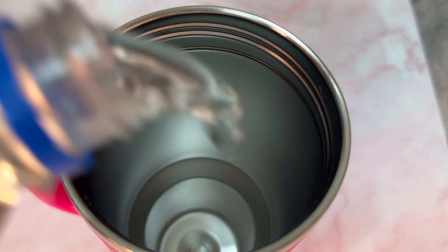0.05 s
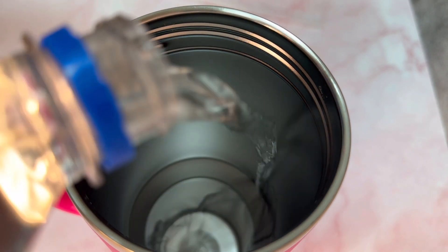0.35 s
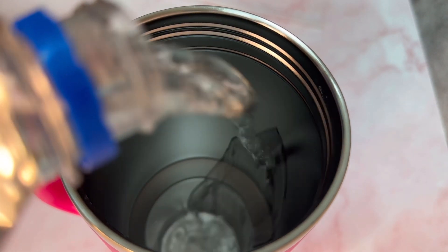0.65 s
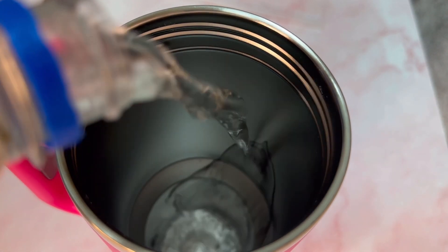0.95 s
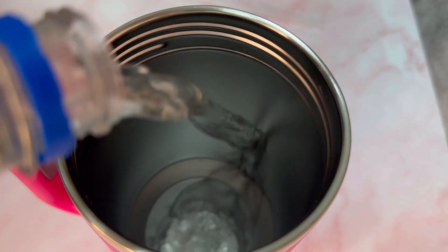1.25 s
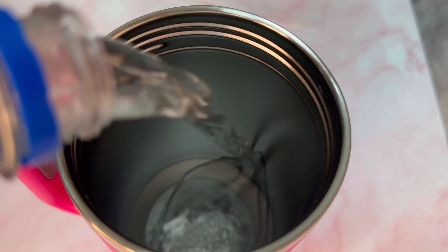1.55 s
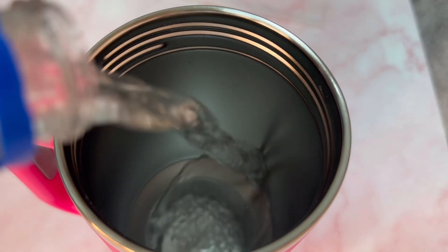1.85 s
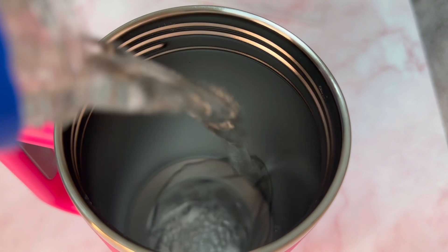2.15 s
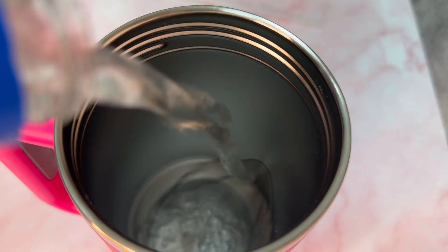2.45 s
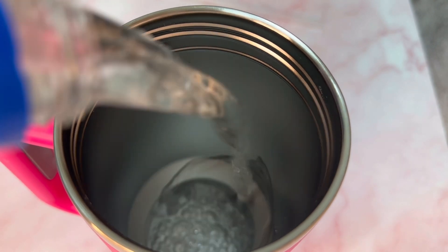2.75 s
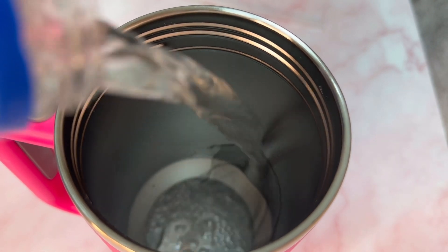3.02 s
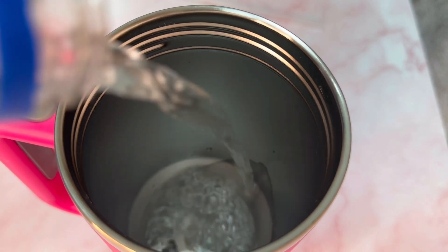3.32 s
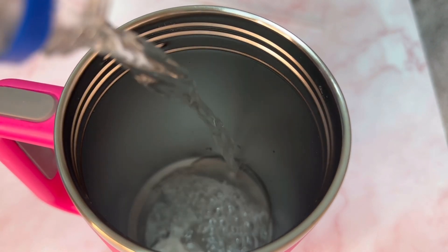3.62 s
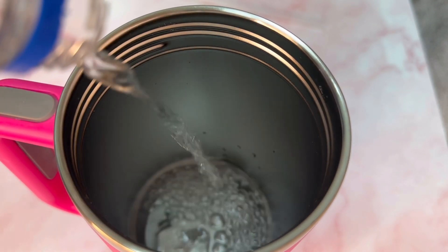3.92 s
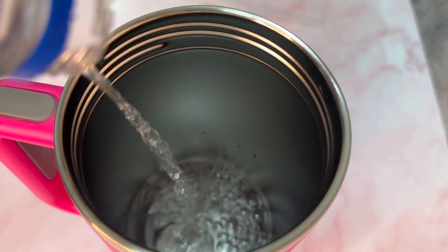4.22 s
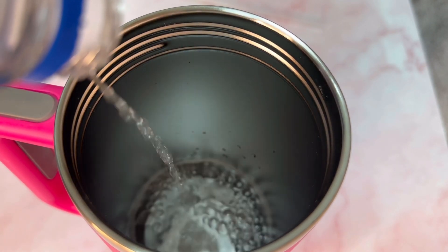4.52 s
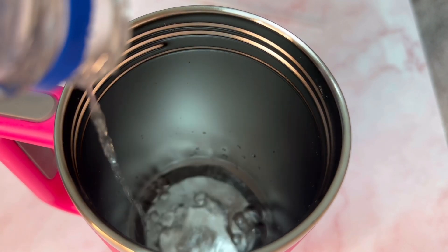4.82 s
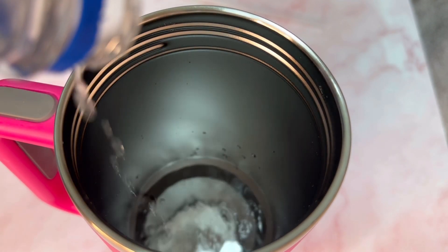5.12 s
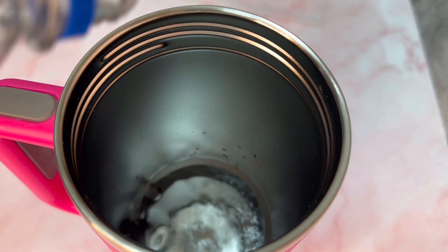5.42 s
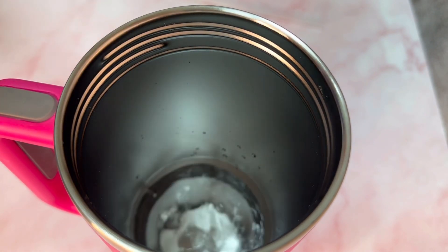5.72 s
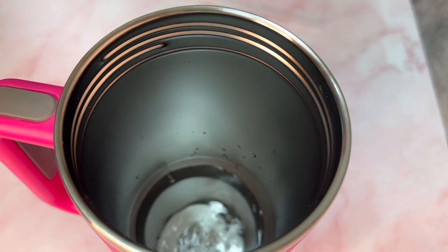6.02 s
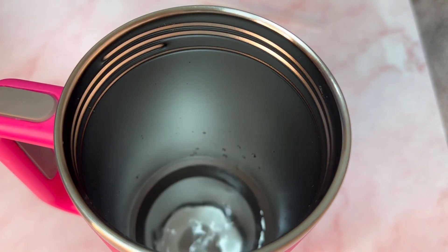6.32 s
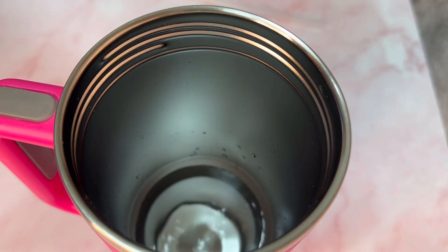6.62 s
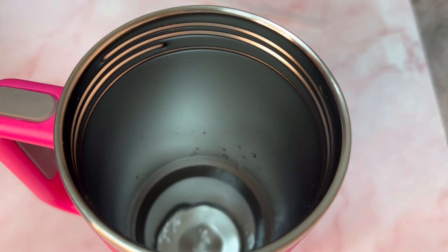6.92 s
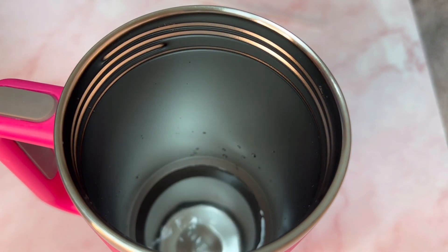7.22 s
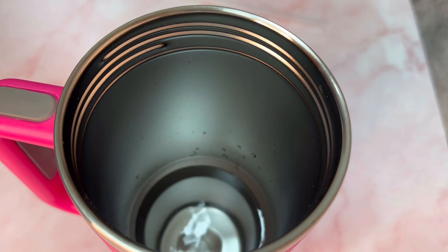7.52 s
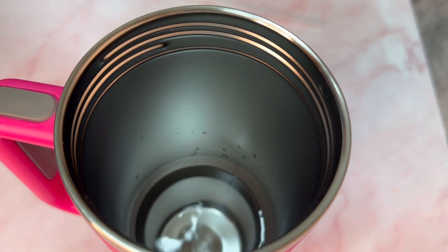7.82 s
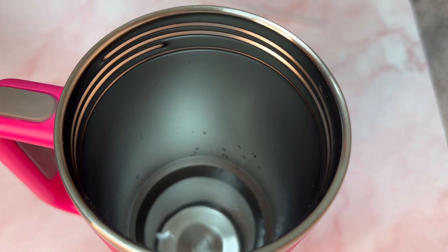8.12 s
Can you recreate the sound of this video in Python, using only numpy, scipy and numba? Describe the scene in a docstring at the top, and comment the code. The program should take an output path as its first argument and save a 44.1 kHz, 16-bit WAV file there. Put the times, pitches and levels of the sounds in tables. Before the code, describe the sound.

A hand shifts faintly on a plastic bottle, and water starts splashing into an empty steel tumbler, right by the microphone. Quick glugs run under a bright, fizzy spray, and the hollow sound of the cup climbs in pitch. The pour dwindles to small plinking drips and stops. The thin bottle then gives a few light crackles as it is handled, leaving only the low background of a quiet room.

```python
"""In a quiet room a hand shifts on a plastic bottle and pours water into an empty steel tumbler, close by.
The jet slaps bare steel at 0.5 s; air glugs into the bottle. Spray and bubbles ring the tumbler's
air column, whose pitch rises as it shortens. From 4 s the stream thins to drips, ending by 5.3 s.
Then the bottle is taken away, crackling and rustling in the hand."""
import sys
import numpy as np
from scipy import signal
from scipy.fft import rfft, irfft, next_fast_len
from scipy.io import wavfile
from scipy.ndimage import uniform_filter1d, map_coordinates
from numba import njit

SR = 44100
rng = np.random.default_rng(int(sys.argv[2]) if len(sys.argv) > 2 else 0)


def persist_wave(psi):
    """Save psi, clipped to +-1, as 16-bit WAV."""
    counts = np.round(np.clip(psi, -1, 1) * 32767).astype(np.int16)
    wavfile.write(sys.argv[1], SR, np.atleast_2d(counts).T)


N = 364398

# Table levels are relative within each source.
# Room noise spectrum. Each row: frequency in Hz, density in dB.
ROOM_SPECTRUM = [(15, -50.5), (25, -20.5), (41, -10.5), (64, -0.5), (76, -11.5), (88, -16.5), (127, -11),
                 (175, -26.5), (208, -21.5), (266, -27.5), (661, -41.5), (957, -53), (2380, -51.5),
                 (6300, -52.5), (9000, -65), (11700, -76.5), (19800, -91.5)]
# Hand slides on the bottle. Each row: start in seconds, length in seconds, rub in dB, hiss in dB.
HAND_STROKES = [(0.035, 0.14, -83.5, -80), (5.369, 0.056, -76.5, -63), (5.48, 0.014, -71.5, -63.5),
                (5.556, 0.092, -70, -58), (6.068, 0.17, -62, -67.5), (6.287, 0.44, -69, -87),
                (6.483, 0.081, -61, -63.5), (6.835, 0.22, -71, -75), (6.948, 0.02, -71, -64.5),
                (7.063, 0.46, -88.5, -94), (7.32, 0.025, -85.5, -79), (7.505, 0.02, -81, -76.5),
                (7.706, 0.093, -71, -63)]
# Skin friction spectrum. Each row: frequency in Hz, density in dB.
RUB_SPECTRUM = [(180, -27), (300, -5.5), (446, -9.5), (572, 4.5), (876, -6), (985, -9), (1480, -8),
                (2270, 1), (3740, -14), (5090, -11), (8760, -31.5), (10000, -61.5), (13000, -69),
                (22000, -120)]
# Plastic hiss spectrum. Each row: frequency in Hz, density in dB.
HISS_SPECTRUM = [(1500, -10), (5000, -3), (8500, 0), (11000, -21.5), (13000, -12.5), (14500, -0.5),
                 (16000, -6.5)]
# Bottle wall modes. Each row: frequency in Hz, width in Hz, gain in dB.
PLASTIC_MODES = [(806, 185, 1.5), (1200, 170, -2), (1525, 290, -1), (2325, 184, 9.5), (3170, 930, -3.5),
                 (4830, 720, -5), (5660, 440, -11.5)]
# Grip shifts. Each row: start in seconds, level in dB.
GRIP_BUMPS = [(0.07, -42), (5.386, -47.5), (5.564, -38.5), (5.625, -42.5), (6.116, -40), (6.494, -46),
              (6.55, -46.5), (7.525, -54.5)]
# Loudest droplet bursts. Each row: start in seconds, level in dB, pitch in Hz.
DROPLETS = [(0.1354, -23.5, 6900), (0.2404, -29.5, 3900), (0.3033, -31, 9000), (0.3451, -27, 13700),
            (0.4835, -15, 7320), (0.5038, -14.5, 9250), (0.8176, -21.5, 6000), (1.1654, -24, 13000),
            (1.1807, -12.5, 12300), (1.2451, -15, 13900), (1.417, -18.5, 8600), (1.5779, -16, 7760),
            (1.6533, -7.5, 7450), (1.7615, -12.5, 10000), (1.8407, -14.5, 14400), (1.965, -13.5, 15300),
            (2.0222, -7.5, 8500), (2.167, -12, 4530), (2.1917, -6.5, 9140), (2.2812, -20, 14900),
            (2.5007, -20.5, 14800), (2.6405, -15, 8600), (2.6825, -7, 4560), (2.9203, -10.5, 7900),
            (3.278, -15.5, 7750), (3.6874, -18, 4500), (3.7926, -14, 15000), (4.0225, -21, 8100),
            (4.036, -24, 14000), (4.0812, -20, 3300), (4.101, -20.5, 6440), (4.127, -24, 8300),
            (4.1528, -23, 14100), (4.1602, -21.5, 4480), (4.183, -17, 13600), (4.2253, -21, 14060),
            (4.247, -30, 14100), (4.2685, -28.5, 9160), (4.2897, -23.5, 5640), (4.3235, -22.5, 3200),
            (4.4132, -23, 8000), (4.4664, -20.5, 5630), (4.5131, -26.5, 14300), (4.6099, -28, 7900),
            (4.8045, -40, 8700), (4.9205, -36.5, 9500), (5.008, -21.5, 7900), (5.0754, -39.5, 14000),
            (5.1395, -41, 14500), (5.1622, -37.5, 8070)]
# Lumps bursting into spray, and the last drop tearing from the lip.
# Each row: start in seconds, level in dB, pitch in Hz, decay in seconds.
SPRAY_BURSTS = [(0.484, -28, 6460, 0.0085), (0.82, -26.5, 5330, 0.0056), (0.858, -25.5, 8700, 0.0096),
                (1.097, -24.5, 8240, .025), (1.19, -19.5, 8560, 0.012), (1.418, -26, 8300, 0.034),
                (2.685, -22.5, 4500, 0.012), (2.87, -25.5, 4560, 0.049), (3.005, -27.5, 5070, 0.13),
                (3.794, -29.5, 4730, 0.0043), (5.272, -41.5, 13920, 0.024), (5.322, -20, 14870, 0.019)]
# Tumbler modes rung by drops. Each row: frequency in Hz, width in Hz, gain in dB.
CUP_MODES = [(2360, 6.2, 12), (4450, 45, 5.5), (8700, 94, 1)]
# Stream splashing. Each row: time in seconds, level in dB.
POUR_DB = [(0.15, -69), (0.33, -59.5), (0.455, -54.5), (0.49, -42.5), (0.57, -48), (0.61, -51), (0.95, -47),
           (1.5, -44), (2.3, -43.5), (3.05, -42.5), (3.45, -46.5), (3.76, -46), (4.2, -52.5), (4.58, -60.5),
           (5.14, -61), (5.27, -80.5)]
# Stream thickness. Each row: time in seconds, share of full flow.
FLOW_SHARE = [(0.1, 0.35), (0.5, 0.75), (1.5, 0.98), (3.0, 0.86), (3.7, 0.74), (4.1, 0.24), (4.5, 0.099),
              (5.0, 0.035), (5.45, 0.098)]
# Sloshes over the lip. Each row: time in seconds, level change in dB.
LIP_SLOSHES = [(2.71, 4), (2.93, 2.5), (3.63, 5), (3.88, 4), (4.0, 2.5), (4.11, -2.5), (4.33, 4)]
# Landing point. Each row: time in seconds, aim (-1 down the wall, 0 glancing, 1 into the pool).
JET_AIM = [(3.0, -0.21), (3.5, 0.42), (3.85, -0.28), (4.0, 1), (4.52, 0.76), (4.78, -0.75)]
# Spray spectrum. Each row: frequency in Hz, gain in dB.
SPRAY_SPECTRUM = [(1500, -17.5), (4500, 4), (6300, -4), (7500, 3), (8600, 3), (10000, 5), (11500, -2),
                  (13000, 2.5), (14600, 8), (15800, 3.5)]
# Fizz spectrum. Each row: frequency in Hz, gain in dB.
FIZZ_SPECTRUM = [(500, -27.5), (1500, -7), (2200, -6.5), (2450, -11.5), (2800, -4), (3400, 0.5), (3800, -4),
                 (4500, 3), (5500, -1.5), (7000, -6.5), (10000, -20.5), (16000, -28)]
# Bare steel modes. Each row: frequency in Hz, width in Hz, gain in dB.
STEEL_MODES = [(1713, 70, 9), (2090, 45, 7), (2584, 88, 12), (4970, 46, 2), (8680, 200, -4), (8900, 140, 2)]
# Air gulped into the bottle, deeper as the air pocket grows.
# Each row: start in seconds, level in dB, final pitch in Hz, burble offset in dB.
BOTTLE_GLUGS = [(0.239, -35, 200, -3.5), (0.298, -44, 200, -5), (0.433, -27.5, 215, -1),
                (0.611, -30.5, 225, 0), (0.778, -28.5, 220, -0.5), (0.969, -37.5, 200, -2.5),
                (1.13, -32, 200, -2), (1.307, -31.5, 200, -3), (1.528, -30, 110, -2),
                (1.746, -28.5, 72, -6.5), (1.912, -26.5, 77, -2), (2.121, -21, 62, -19.5),
                (2.313, -16, 62, -21.5), (2.533, -22.5, 68, -9.5)]
# Tumbler air column. Each row: time in seconds, first, second and third resonance in Hz.
COLUMN_HZ = [(0.4, 370, 1400, 1620), (1.0, 402, 1100, 1660), (1.9, 392, 1230, 1963), (2.9, 450, 1430, 2120),
             (3.65, 498.5, 1460, 2240), (4.8, 472, 1530, 2265)]
# Clear bubbles under the jet. Each row: start in seconds, level in dB, pitch in Hz.
BRIGHT_BUBBLES = [(0.481, -27, 4800), (0.534, -30, 1560), (0.563, -30.5, 1080), (0.5945, -30, 4420),
                  (0.635, -27.5, 3340), (0.672, -24, 1050), (0.7087, -25, 4540), (0.82, -27.5, 1117),
                  (0.821, -23, 1933), (0.854, -25.5, 990), (0.869, -21, 4350), (1.015, -24.5, 1654),
                  (1.037, -27, 2350), (1.039, -32, 810), (1.097, -31.5, 1200), (1.166, -19.5, 1804),
                  (1.182, -26.5, 1105), (1.2605, -23, 3440), (1.286, -28.5, 763), (1.387, -23, 4420),
                  (1.429, -33, 1177), (1.677, -21, 1876), (1.706, -27.5, 1320), (1.775, -27.5, 1267),
                  (1.914, -25.5, 1174), (1.964, -25.5, 1290), (2.024, -23, 1220), (2.0963, -23.5, 3340),
                  (2.097, -25, 1950), (2.246, -19.5, 1290), (2.565, -30, 1310), (2.741, -29, 1304),
                  (2.807, -27.5, 1940), (2.814, -21, 3380), (3.193, -27.5, 3350), (3.6161, -21, 4860),
                  (3.676, -27.5, 1400), (3.901, -29, 1414), (4.081, -25, 1980), (4.121, -24.5, 2810),
                  (4.128, -31, 806), (4.162, -32, 1250), (4.324, -25, 2556)]
# Big bubbles near the lowest air resonance. Each row: start in seconds, level in dB, pitch in Hz.
DEEP_BUBBLES = [(1.234, -15, 531), (1.553, -22, 408), (1.581, -18, 436), (1.654, -18.5, 523),
                (1.72, -25, 295), (1.782, -15, 410), (1.963, -22, 415), (2.004, -24.5, 411),
                (2.056, -21.5, 423), (2.166, -13, 428), (2.196, -20, 423), (2.242, -18, 415),
                (2.454, -29.5, 434), (2.565, -24.5, 434.5), (2.72, -27, 439), (3.282, -20.5, 471),
                (3.325, -21.5, 475), (3.362, -28, 474), (3.4, -24, 472), (3.454, -24.5, 490),
                (3.53, -29, 487), (3.593, -22, 479), (3.637, -20.5, 540), (3.694, -18.5, 527),
                (3.975, -22.5, 560), (4.022, -20, 510), (4.044, -16.5, 563), (4.103, -19.5, 585),
                (4.128, -27, 614), (4.164, -24.5, 563), (4.168, -27.5, 427), (4.214, -22.5, 525),
                (4.229, -27, 433), (4.325, -18.5, 476), (4.356, -27, 478), (4.481, -27.5, 572),
                (4.528, -32.5, 560)]
# Air in the emptying bottle. Each row: time in seconds, resonance in Hz.
BOTTLE_AIR_HZ = [(2.6, 338), (3.3, 300), (4.2, 308)]
# Single drops into the pool. Each row: start in seconds, level in dB, starting pitch in Hz.
POOL_DRIPS = [(4.185, -25, 1390), (4.289, -33, 1423), (4.389, -39, 1830), (4.481, -32.5, 723),
              (4.518, -33, 1350), (4.561, -39.5, 1070), (4.61, -36, 1560), (4.7434, -28, 2580),
              (4.804, -30, 1403), (4.875, -52, 1610), (4.922, -39.5, 4430), (4.946, -44.5, 1310),
              (4.994, -50, 1590), (5.017, -39, 2610), (5.038, -33, 2550), (5.083, -37, 1520)]
# Bottle wall buckling. Each row: start in seconds, level in dB, treble in dB.
BUCKLES = [(5.418, -41, 1), (5.933, -30, -24), (6.045, -49.5, -3), (6.084, -39.5, -17), (6.11, -35, -9),
           (6.133, -27, -4), (6.136, -30, -16), (6.15, -43, -21), (6.319, -48.5, -13), (6.345, -42.5, -9),
           (6.434, -39, 0), (6.45, -36, -9), (6.499, -31, -12), (6.537, -40.5, -25), (6.559, -36, -21),
           (6.697, -54, -34), (6.716, -48.5, -42), (6.789, -36.5, -12), (6.836, -32, -11.5),
           (6.851, -33, -13.5)]
# Dents springing back. Each row: start in seconds, level in dB.
WALL_DENTS = [(5.935, -38.5), (6.137, -34), (6.857, -49)]
# Stereo image of the tumbler's mouth.
# Each row: frequency in Hz, left minus right in dB, left lead in radians.
MOUTH_STEREO = [(100, 0.5, 0), (372, 1.5, 0.72), (786, 7.5, -0.23), (970, 3, -0.12), (1390, 12.5, 2),
                (1630, 1, 1.45), (1950, 5, 0.5), (2270, 3.5, 1.5), (3400, 6, 1.5), (4200, 4, 0.8),
                (4920, 1, -1), (5850, -1, -0.03), (7100, 4, 1.8), (7700, 6, 3), (7970, 3, -0.5),
                (8920, 0.8, -0.74), (12040, 0, -4), (12300, -2, -10), (13900, 0.5, -5.5), (15000, -0.5, -6),
                (16000, -0.5, -9)]
# Echoes in the tumbler. Each row: frequency in Hz, T60 in seconds, channel difference from 0 to 1.
CUP_DECAY = [(500, 0.098, 0.1), (2522, 0.043, 1), (6900, 0.04, 0.9), (8600, 0.046, 0.1), (11200, 0.014, 0),
             (12800, 0.025, 0.01), (14500, 0.029, 0.05)]
# Room echoes. Each row: frequency in Hz, T60 in seconds, channel difference from 0 to 1.
ROOM_DECAY = [(150, 0.77, 0.079), (726, 0.27, 0.9), (2376, 0.23, 0.75), (6060, 0.3, 0.92),
              (14000, 0.099, 1)]

LANDING_S = 0.52  # full jet hits the steel
PUDDLE_DEPTH, POOL_DEPTH, FOAM_DEPTH = 0.12, 0.26, 0.38  # onsets, as shares of final depth


def amp(db):
    """Decibels to gain."""
    return 10 ** (np.asarray(db) / 20)


def unit(x):
    """Scale to rms 1."""
    return x / np.sqrt(np.mean(x ** 2) + 1e-20)


def along(points, hz, column=1):
    """Read a frequency table on a log axis."""
    table = np.transpose(points)
    return np.interp(np.log(hz + 1), np.log(table[0] + 1), table[column])


def curves(rows):
    """Per-sample curve for each column after the time."""
    s, *cols = np.transpose(rows)
    return [np.interp(np.arange(N) / SR, s, c) for c in cols]


def at(curve, s):
    """Curve value at time s."""
    return curve[min(max(round(s * SR), 0), N - 1)]


def envelope(s, length_s, attack_s, release_s):
    """Rise from time s, hold, decay."""
    t = np.arange(N) / SR - s
    return np.clip(t / attack_s, 0, 1) * np.exp(-np.maximum(t - length_s, 0) / release_s)


def wobble(rate_hz):
    """Smooth random curve."""
    knots = rng.standard_normal(int(N * rate_hz / SR) + 4)
    return map_coordinates(knots, [np.arange(N) * rate_hz / SR], order=2)


def add(track, s, sound):
    """Mix a sound in at time s."""
    part = track[..., max(round(s * SR), 0):][..., :sound.shape[-1]]
    part += sound[..., :part.shape[-1]]


def filtered(x, response):
    """Apply a complex frequency response."""
    n = x.shape[-1]
    m = next_fast_len(n + 8192)
    return irfft(rfft(x, m) * response(np.fft.rfftfreq(m, 1 / SR)), m)[..., :n]


def coloured(x, spectrum):
    """Apply a (Hz, dB) spectrum; scale to rms 1."""
    return unit(filtered(x, lambda hz: amp(along(spectrum, hz))))


def body(x, modes):
    """Pass x through resonances of alternating sign."""
    return filtered(x, lambda f: sum(
        (-1) ** k * amp(db) * 1j * f * width_hz / (hz * hz - f * f + 1j * f * width_hz)
        for k, (hz, width_hz, db) in enumerate(modes)))


@njit
def resonate(x, hz, width_hz):
    """Moving resonance, unit gain at its centre."""
    y, z, keep = np.zeros(len(x)), 0j, np.exp(-np.pi * width_hz / SR)
    for i in range(len(x)):
        z = z * keep * np.exp(2j * np.pi * hz[i] / SR) + x[i]
        y[i] = 2 * (1 - keep) * z.real
    return y


def at_peak(db, click):
    """Scale a stereo click's loudest millisecond to db."""
    power = uniform_filter1d(np.mean(click ** 2, axis=0), size=SR // 1000)
    return amp(db) * click / np.sqrt(power.max())


def strike(db, decay_s, response, apart):
    """Stereo click: sharp front and decaying noise, filtered."""
    t = np.arange(SR // 8) / SR
    noise = rng.standard_normal(len(t)) + apart * rng.standard_normal((2, len(t)))
    burst = noise * np.exp(-t / decay_s)
    burst[:, 8] += 4.5  # first contact
    return at_peak(db, filtered(burst, response))


def bubble(hz, swell_s, rise):
    """A bubble pinches off, swells and dies; its pitch glides by rise."""
    t = np.arange(SR // 6) / SR
    age = t / max(swell_s, .0005)
    glide_hz = hz * (1 + rise * (np.minimum(age, 5) - 1.5))
    return age * np.exp(1 - age) * np.sin(2 * np.pi * np.cumsum(glide_hz) / SR)


def swarm(per_s, band_hz, cycles, spread_db, rise, scatter_rad, thinning, samples):
    """Stereo bubble cloud of damped rising sines; thin flow gives fewer, more distinct ones."""
    span_s, (low_hz, high_hz) = POUR_DB[-1][0], band_hz
    rows = rng.random((int(per_s * span_s), 6))
    share = np.interp(rows[:, 0] * span_s, *np.transpose(FLOW_SHARE)) ** thinning
    alive = rows[:, 5] < share
    when, pitch, strength, life, place, _ = rows[alive].T[..., None]
    hz = low_hz * (high_hz / low_hz) ** pitch
    t = np.arange(samples) / SR
    age = t * hz / (cycles * (.5 + life))
    gain = amp(-spread_db * np.log(1 - .98 * strength)) / np.sqrt(share[alive, None])
    shape = gain * np.exp(-age) * (1 - np.exp(-10 * age)) * (1 - t * SR / samples)
    phase = 2 * np.pi * hz * t * (1 + rise * np.minimum(age, 4) / 2)
    index = ((when * span_s * SR).astype(int) + np.arange(samples)).ravel()
    sides = [shape * np.sin(phase + side * scatter_rad * (place - .5)) for side in (1, -1)]
    return unit(np.array([np.bincount(index, waves.ravel(), N)[:N] for waves in sides]))


def echoes(x, decay, samples):
    """Ever-changing diffuse stereo tail; decay time depends on frequency."""
    out, hop = np.zeros((2, N)), SR // 3
    padded = np.pad(x, ((0, 0), (0, 2 * hop)))
    for start in range(0, N, hop):
        hz, t, noise = signal.stft(rng.standard_normal((3, samples)), SR, nperseg=256)
        apart = np.clip(along(decay, hz, column=2), 0, 1)[:, None]
        stereo = np.sqrt(apart) * noise[:2] + np.sqrt(1 - apart) * noise[2]
        tail = signal.istft(stereo * amp(-60 * t / along(decay, hz)[:, None]), SR, nperseg=256)[1]
        piece = padded[:, start:start + 2 * hop] * np.sin(np.linspace(0, np.pi, 2 * hop))
        add(out, start / SR, signal.fftconvolve(piece, tail / np.linalg.norm(tail[0]), axes=1))
    return out


def filling():
    """Flow and the depth it builds, both 0-1."""
    flow, = curves(FLOW_SHARE)
    return flow, np.cumsum(flow) / flow.sum()


def room_tone():
    """Centred rumble under faint, wide hiss."""
    rumble = rng.standard_normal(N)
    flicker = amp(1.2 * wobble(7.4))
    hiss = filtered(rng.standard_normal((2, N)), lambda hz: 2.6 * hz / (hz + 700))
    return amp(-60.5) * coloured(rumble + flicker * hiss, ROOM_SPECTRUM)


def hand_rub():
    """Skin sticks and slips on the plastic."""
    rub_gain, hiss_gain = sum(
        amp([[rub_db], [hiss_db]]) * envelope(s, length_s, attack_s=0.012, release_s=0.027)
        for s, length_s, rub_db, hiss_db in HAND_STROKES)
    grip = amp(2.95 * wobble(160))
    friction = coloured(grip * rng.standard_normal((2, N)), RUB_SPECTRUM)
    rub = unit(friction + amp(-15) * body(friction, PLASTIC_MODES))
    hiss = coloured(grip * rng.standard_normal((2, N)), HISS_SPECTRUM)
    return amp(10.5) * rub_gain * rub + amp(3.5) * hiss_gain * hiss


def finger_bumps():
    """Fingers shift grip with soft bumps."""
    gain = sum(amp(db) * envelope(s, 0.0038, attack_s=0.0038, release_s=0.023) for s, db in GRIP_BUMPS)
    spectrum = [(70, -52.5), (195, 6.5), (290, -13), (450, -5), (900, -43)]
    return amp(-7.5) * gain * coloured(rng.standard_normal(N), spectrum)


def strays(start_s, end_s, over_db, spread_db, count):
    """Random rows like DROPLETS; levels follow the stream."""
    when, strength, pitch = rng.random((count, 3)).T
    s = start_s + when * (end_s - start_s)
    db = np.interp(s, *np.transpose(POUR_DB)) + over_db - spread_db * strength
    return list(zip(s, db, 15000 - 11500 * pitch))


def splats():
    """Bursting droplets tick, strongest near the pitch of their tiny bubbles."""
    out = np.zeros((2, N))
    flow, _ = filling()
    ring = lambda f, hz, width_hz: 1 / (1 + 1j * (f - hz) / width_hz) ** 2
    scattered = strays(LANDING_S, 4.6, over_db=12.5, spread_db=5.5, count=10)
    patter = strays(4.6, 4.62, over_db=20, spread_db=9.5, count=22)  # thin stream breaks up
    for s, db, hz in list(DROPLETS) + scattered + patter:
        lone = 1 - at(flow, s)  # lone drops crack harder, shorter, broader
        decay_s = 0.0014 * (1 - lone) + 0.00074 * lone
        tick = lambda f: amp(-9 + 5.5 * lone) * (f / (f + 0.2 * hz)) ** 2 + ring(f, hz, width_hz=1200)
        add(out, s, strike(db - 4.5 + 4.1 * lone, decay_s, tick, apart=0.047))
    for s, db, hz, decay_s in SPRAY_BURSTS:
        spurt = lambda f: amp(-12.5) * ring(f, 8700, width_hz=880) + ring(f, hz, width_hz=940)
        add(out, s, strike(db - 6.5, decay_s, spurt, apart=0.22))
    return out


def splash_gain():
    """Stream gain: moves with sloshes and the slug of water that lands after each glug."""
    t = np.arange(N) / SR
    db, = curves(POUR_DB)
    slug_delay_s, slug_db, width_s = 0.034, 2, 0.049
    slugs = [(s + slug_delay_s, slug_db) for s, *_ in BOTTLE_GLUGS]
    for s, extra_db in slugs + list(LIP_SLOSHES):
        db = db + extra_db * np.exp(-np.minimum(np.abs(t - s) / width_s, 10) ** 2)
    pouring = (t > POUR_DB[0][0]) & (t < POUR_DB[-1][0])
    return amp(db) * uniform_filter1d(1.0 * pouring, size=900)


def spray(surge, depth):
    """Fine mist off the jet, strongest in the empty cup."""
    mist = swarm(per_s=3500, band_hz=(6440, 17100), cycles=3.6, spread_db=6.5,
                 rise=.02, scatter_rad=0.1, thinning=1.1, samples=96)
    return amp(2.5 + 4 * (1 - depth)) * coloured(mist * surge, SPRAY_SPECTRUM)


def fizz(surge, flow, depth):
    """Tiny bubbles: none on dry steel, more as foam builds."""
    ticks = swarm(per_s=6000, band_hz=(1580, 7750), cycles=4, spread_db=7,
                  rise=0.017, scatter_rad=1.2, thinning=1.1, samples=96)
    beads = swarm(per_s=650, band_hz=(1973, 8030), cycles=5, spread_db=4.6,
                  rise=0.008, scatter_rad=1.9, thinning=0.9, samples=300)
    gain = amp(-4 + 4.5 * depth) * flow ** 0.071 / (1 + (0.02 / depth) ** 3)
    return gain * coloured((ticks + amp(3) * flow * beads) * surge, FIZZ_SPECTRUM)


def bare_steel(splash):
    """The bottom rings until water covers it."""
    bare = np.interp(np.arange(N) / SR - LANDING_S, [.06, .35], [1, 0])
    trickle_gain = amp(-59) * envelope(POUR_DB[0][0], .5, attack_s=.1, release_s=0.044)
    trickle = trickle_gain * rng.standard_normal(N)
    return amp(4) * body(bare * (splash + trickle), STEEL_MODES)


def glugs():
    """Each air gulp swells in the bottle, so its pitch drops fast; smaller bubbles burble off."""
    out, t = np.zeros(N), np.arange(SR // 5) / SR
    swell_s, drop_s, smallest_bubble_hz = 0.014, .007, 605
    age = t / swell_s
    for s, db, end_hz, burble_db in BOTTLE_GLUGS:
        hz = end_hz * (1 + 1.8 * np.exp(-t / drop_s))
        add(out, s, amp(db - 7.5) * age * np.exp(1 - age) * np.sin(2 * np.pi * np.cumsum(hz) / SR))
        for late, pitch, strength in rng.random((7, 3)):
            piece_hz = end_hz * (smallest_bubble_hz / end_hz) ** pitch
            piece = amp(db + burble_db - 1.5 * strength) * bubble(piece_hz, .7 / piece_hz, rise=0.0047)
            add(out, s + 0.0035 + 0.044 * late ** 1.9, piece)
    return out


def big_bubbles():
    """Single loud bubbles; the air column rings on after them."""
    deep, bright, t = np.zeros(N), np.zeros(N), np.arange(SR // 6) / SR
    first_hz, second_hz, _ = curves(COLUMN_HZ)
    _, depth = filling()
    for s, db, hz in DEEP_BUBBLES:
        note_hz = at(first_hz, s)
        cycles = 1.6 + 3.8 * np.exp(-((hz - note_hz) / 40) ** 2)  # longer swell when in tune
        add(deep, s, amp(db - 2.5) * bubble(hz, cycles / hz, rise=-0.028))
        kick = amp(db - 12) * (1.6 / cycles) ** 2  # short bubbles kick the column harder
        add(deep, s, kick * bubble(note_hz, swell_s=0.0097, rise=0))
    slap_spectrum = [(300, -15), (900, -9.5), (2500, 4.5), (9000, -19.5)]
    for s, db, hz in BRIGHT_BUBBLES:
        slap = coloured(rng.standard_normal(len(t)), slap_spectrum) * np.exp(-t / 0.012)
        rise = 0.09 * (at(depth, s) - .5)  # sags in a puddle, climbs in deep water
        add(bright, s, amp(db - 2) * (bubble(hz, 4.18 / hz, rise) + amp(-14.5) * slap))
    upper = amp(-9.5) * resonate(bright, second_hz, 45.)
    lower = amp(-4) * resonate(bright + amp(-14.5) * deep, first_hz, 35.)
    return deep + bright + upper + lower


def bubbling(depth, aim):
    """Submerged bubbles ring the upper air resonances and one cup mode; foam muffles them."""
    _, second_hz, third_hz = curves(COLUMN_HZ)
    froth = swarm(per_s=900, band_hz=(544, 3010), cycles=3, spread_db=6,
                  rise=0.02, scatter_rad=1.7, thinning=0.6, samples=400)
    mono = froth.mean(0)
    column = resonate(mono, second_hz, 100.) + amp(2 - 11 * depth) * resonate(mono, third_hz, 230.)
    cup = amp(-3.5) * resonate(mono, np.full(N, 2290.), 42.)
    # a shallow puddle holds only small bubbles: pitch sinks with depth
    puddle_hz = 1310 * (PUDDLE_DEPTH / np.maximum(depth, .03)) ** 0.63
    puddle = unit(resonate(mono, puddle_hz, 230.)) / (1 + (depth / FOAM_DEPTH) ** 8)
    plunge_db = 12.5 * np.maximum(aim, 0) ** 2  # a plunging jet drives more air under
    gain = amp(plunge_db - 8.5 * depth) / (1 + (PUDDLE_DEPTH / depth) ** 2)
    return gain * (amp(3) * unit(amp(-21) * froth + column + cup) + amp(-6) * puddle)


def hollow_note(flow, depth, aim):
    """The churning surface sounds the lowest air resonance and, faintly, the bottle's air."""
    first_hz, _, _ = curves(COLUMN_HZ)
    bottle_hz, = curves(BOTTLE_AIR_HZ)
    churn = swarm(per_s=650, band_hz=(327, 874), cycles=2.7, spread_db=4,
                  rise=0.033, scatter_rad=0.22, thinning=0.97, samples=900)[0]
    bottle_air = resonate(churn, bottle_hz, 9.6) + resonate(churn, np.full(N, 138.), 30.)
    note = resonate(resonate(churn, first_hz, 210.), first_hz, 26.)
    gain = amp(2.5 + 11 * aim) * flow ** 0.18 / (1 + (POOL_DEPTH / depth) ** 5)
    return gain * unit(amp(-17.5) * churn + note + flow ** 0.27 * amp(-2) * bottle_air)


def foam(flow, depth):
    """Settling foam hisses as the flow dies."""
    spectrum = [(700, -8.5), (2400, -0.5), (5000, -1), (9000, -3), (11300, -20), (14500, -6.5)]
    return amp(-8.5) * (1 - flow) * depth * coloured(rng.standard_normal((2, N)), spectrum)


def drips():
    """Each drop slaps the pool and traps a bubble whose pitch climbs as it surfaces."""
    plips, wet, t = np.zeros(N), np.zeros(N), np.arange(SR // 10) / SR
    ring_cycles, rise_s = 13, 0.03
    climb = 1 + 0.2 * np.minimum(t / rise_s, 2) ** 2
    splash_spectrum = [(900, -22), (2600, 9.5), (4500, -9.5), (9000, -7.5), (15000, -10)]
    splash_shape = amp(-15.5) * np.exp(-t / 0.0014) + amp(-26) * np.exp(-t / .018)
    for s, db, hz in POOL_DRIPS:
        shape = (1 - np.exp(-hz * t / 1.2)) * np.exp(-hz * t / ring_cycles)
        add(plips, s, amp(db - 1.5) * shape * np.sin(2 * np.pi * np.cumsum(hz * climb) / SR))
        add(wet, s, amp(db) * splash_shape * coloured(rng.standard_normal(len(t)), splash_spectrum))
    first_hz, second_hz, _ = curves(COLUMN_HZ)
    column = amp(3) * resonate(plips, second_hz, 9.) + amp(17) * resonate(plips, first_hz, 14.)
    return plips + wet + column


def crackles():
    """The thin wall buckles in dry bursts of a few milliseconds."""
    out, t = np.zeros((2, N)), np.arange(SR // 16) / SR
    swell_s, decay_s = 0.0032, 0.002
    age = t / swell_s
    for s, db, treble_db in BUCKLES:
        noise = rng.standard_normal(len(t)) + 0.71 * rng.standard_normal((2, len(t)))
        flex = body(noise * age * np.exp(-age ** 2), PLASTIC_MODES)
        crack = filtered(noise * np.exp(-t / decay_s),
                         lambda hz: amp(treble_db - 4 + along(HISS_SPECTRUM, hz)))
        add(out, s, at_peak(db - 6, flex + crack))
    return out


def dents(hz=875, attack_s=.0006, decay_s=0.01):
    """A deep dent springs back; the whole wall rings briefly."""
    out, t = np.zeros(N), np.arange(SR // 10) / SR
    ring = (1 - np.exp(-t / attack_s)) * np.exp(-t / decay_s) * np.sin(2 * np.pi * hz * t)
    for s, db in WALL_DENTS:
        add(out, s, amp(db) * ring)
    return out


def stream():
    """Jet mix: it dribbles, slaps the empty bottom, then lands in lumps."""
    gain = splash_gain()
    flow, depth = filling()
    aim, = curves(JET_AIM)
    slap_db = np.interp(np.arange(N) / SR - LANDING_S, [-.012, .005, .11], [-7, 4, 0])
    surge = amp(slap_db + 4 * wobble(45))
    splash = gain * (spray(surge, depth) + fizz(surge, flow, depth))
    steel = bare_steel(splash)
    pool = gain * (bubbling(depth, aim) + hollow_note(flow, depth, aim) + foam(flow, depth))
    return splash * flow / (flow + 0.061) + steel + pool


def tumbler():
    """Water mix, smeared by the steel walls, heard just above the rim."""
    jet, ticks, plips, bubbles = stream(), splats(), drips(), big_bubbles()
    ring = body(ticks + plips, CUP_MODES)
    send = amp(-1) * jet + amp(-4) * ticks + amp(-8) * bubbles + amp(-16) * plips
    smear = filtered(echoes(send, CUP_DECAY, samples=SR // 10), lambda hz: hz / (hz + 1200))
    water = jet + ticks + plips + bubbles + ring + glugs() + smear
    side = np.array([[.5], [-.5]])
    return filtered(water, lambda hz: amp(side * along(MOUTH_STEREO, hz))
                    * np.exp(1j * side * along(MOUTH_STEREO, hz, column=2)))


def bottle():
    """Handling mix, snaps to the left; the tumbler hums faintly along."""
    left, right = crackles() + amp(-5) * dents()
    snaps = np.array([amp(8.5) * left, amp(3) * np.roll(right, SR // 2600)])
    handling = snaps + hand_rub() + finger_bumps()
    return handling + body(handling, [(2310, 45, -4)])


def scene():
    """Water and bottle in the room."""
    water, plastic = tumbler(), bottle()
    reverb = echoes(amp(-13) * water + amp(-10.5) * plastic, ROOM_DECAY, samples=SR * 2 // 3)
    return water + plastic + reverb + room_tone()


def record(dry):
    """Cut the deepest bass and the top treble."""
    low_hz, top_hz = 22, 16000
    return filtered(dry, lambda hz: (1j * hz / (1j * hz + low_hz)) ** 2 / (1 + (hz / top_hz) ** 120))


dry = scene()
out = record(dry)
persist_wave(out)
```